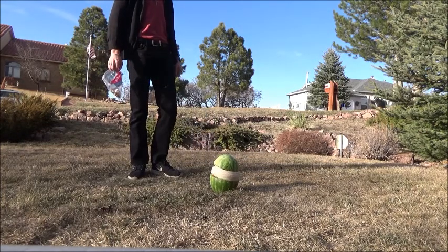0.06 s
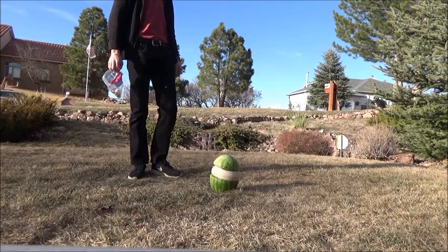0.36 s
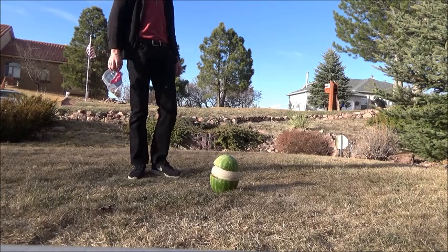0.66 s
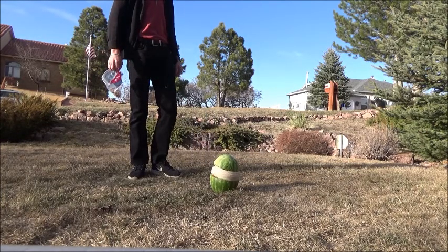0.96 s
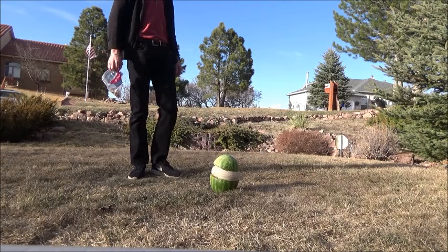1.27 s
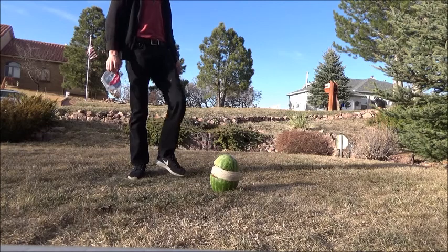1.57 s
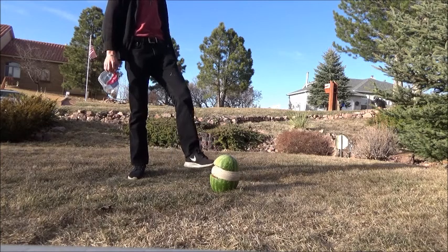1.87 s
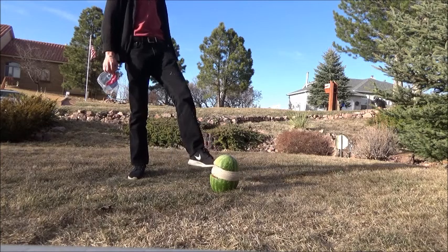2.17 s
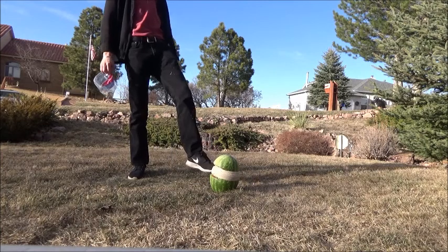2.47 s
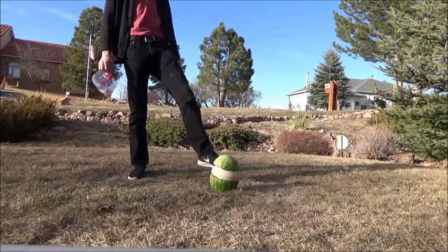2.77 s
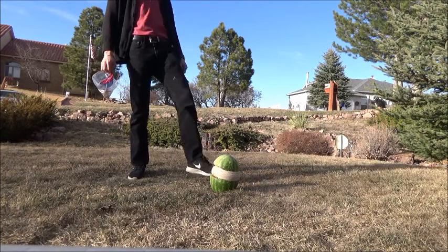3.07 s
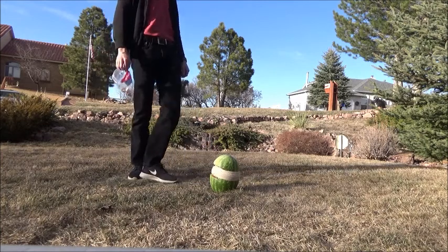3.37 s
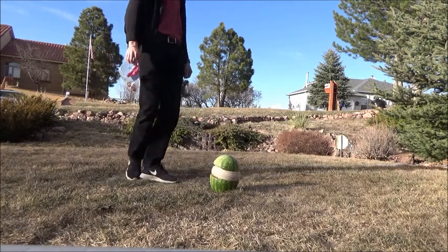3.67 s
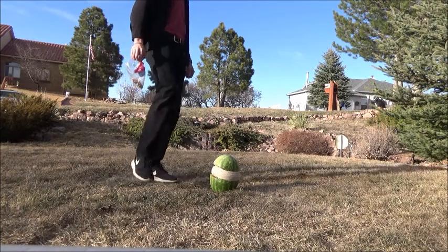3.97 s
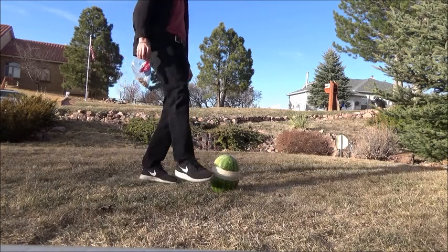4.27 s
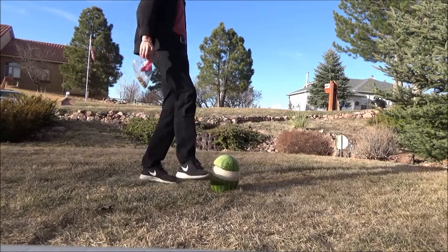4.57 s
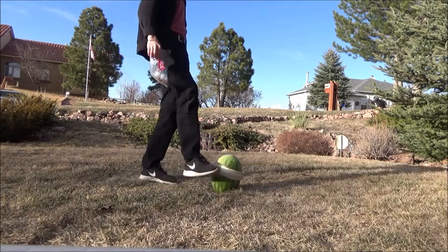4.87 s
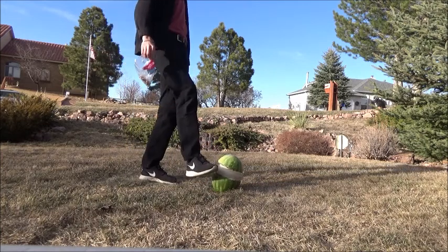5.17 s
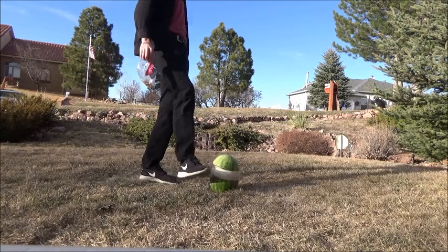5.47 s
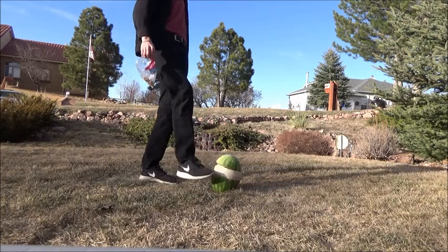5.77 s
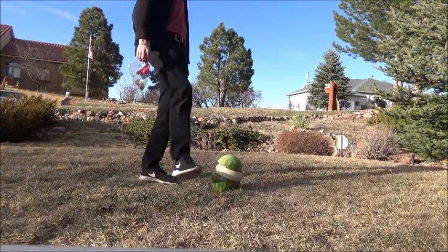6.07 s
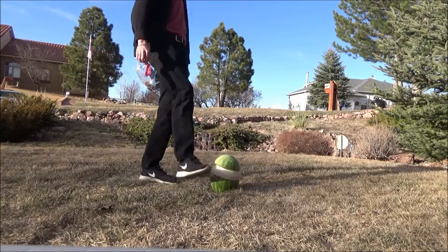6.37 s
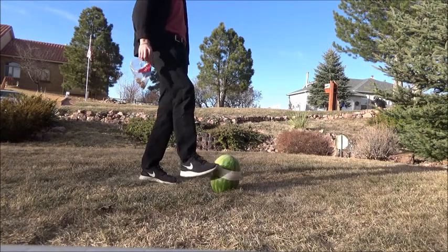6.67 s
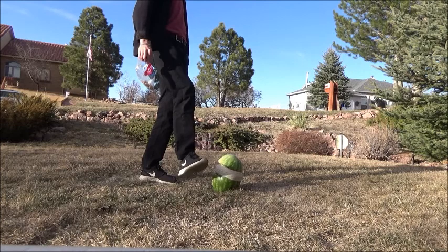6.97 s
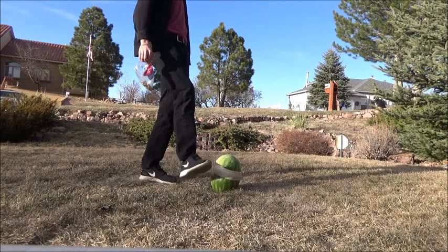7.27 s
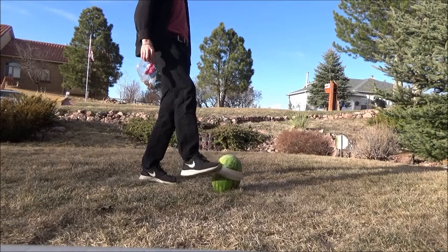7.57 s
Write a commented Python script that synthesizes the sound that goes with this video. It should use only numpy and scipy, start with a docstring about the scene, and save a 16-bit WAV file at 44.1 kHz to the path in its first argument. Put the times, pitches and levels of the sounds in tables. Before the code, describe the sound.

Outdoors on a dry lawn, light wind and distant traffic make a quiet, steady background. Rubber bands slip on a watermelon with a few sharp snaps as a shoe pushes it. The foot steps back into crackling grass, with a faint rustle of trousers and a plastic bag. Then come six soft kicks, dull thuds with small scuffs, mixed with more snaps. The microphone is a few steps away.

```python
"""Rubber bands slip and snap on a watermelon's rind as a shoe pushes and then kicks it on a dry lawn.
Each snap is a jerk that rings briefly; each kick is a scuff and a dull thud in the flesh.
The foot steps back into crackling grass, and trousers and a plastic bag rustle.
Behind it lie a bird, light wind, far traffic, a low hum and a camera's faint whirr and whine."""
import sys
import numpy as np
from scipy import signal
from scipy.fft import rfft, irfft, next_fast_len
from scipy.io import wavfile
from scipy.ndimage import map_coordinates

SR = 44100
rng = np.random.default_rng(int(sys.argv[2]) if len(sys.argv) > 2 else 0)


def wav_out(sig):
    """Save sig, one row per channel (or a flat mono array), as 16-bit PCM at SR to the path in sys.argv[1]."""
    wavfile.write(sys.argv[1], SR, np.round(np.clip(np.atleast_2d(sig).T, -1, 1) * 32767).astype(np.int16))


N = 340011

# The bands slipping. Each row: time in seconds, rind knock in dB and Hz, band slap in dB and Hz,
# bright tick in dB and Hz, burr of noise in dB compared with the jerk.
BAND_SNAPS = [(2.0923, -32, 1800, -15, 3850, -30, 10000, -8), (2.2926, -30, 1800, -16, 3660, -27, 9800, -1),
              (2.3423, -0.5, 1820, -11, 7000, 0.5, 10000, -13),
              (2.3448, -7, 1800, -14.5, 4200, -9.5, 7900, 0.5),
              (3.023, -30, 1800, -20, 3500, -20, 10000, -9), (3.035, -30, 1800, -23, 3500, -21, 10800, -9),
              (3.4235, -20, 2300, 1, 3300, 6.5, 10300, -20), (4.8592, -14, 1400, -13, 2900, -26, 9800, -11),
              (4.9341, -9, 1300, -8.5, 2900, -14, 9800, 3), (4.9364, -8, 1190, -5, 4500, -1, 9500, -26),
              (4.938, -6, 1900, -8, 3200, -5.5, 9300, -10),
              (5.0214, -16.5, 1900, -19.5, 4100, -24, 8800, 9.5),
              (5.0695, -17, 1800, -18, 3500, -20.5, 9900, -6),
              (5.3345, -30, 1800, -33, 3500, -19, 9500, -10), (5.545, -27, 1800, -15, 3480, -24, 9200, 4.5),
              (5.8219, -17, 1600, -7.5, 3700, -8.5, 9350, -9),
              (6.393, -13.5, 1490, -19.5, 2980, -32, 9800, 3),
              (6.780, -5.5, 1890, -22, 3000, -17, 9800, -8), (7.6235, -17, 2200, -23, 3300, -9, 10500, -16),
              (7.6565, -0.5, 1440, -3.5, 2940, -6.5, 9300, -7), (7.6588, 0, 1440, -7, 3070, -16, 10200, 1)]


def rubber_bands(knock_width=680, slap_width=1900, tick_width=2900, burr_t60=0.016, burr_rise_s=0.0018):
    """Each snap is a sharp jerk inside a brief burr of noise that swells and fades; three tones ring."""
    out, lead = np.zeros(N), SR // 100
    t = np.arange(-lead, SR // 25) / SR
    for s, knock_db, knock_hz, slap_db, slap_hz, tick_db, tick_hz, burr_db in BAND_SNAPS:
        burr = rng.standard_normal(len(t)) * amp(-60 * np.maximum(t / burr_t60, -t / burr_rise_s))
        jerk = (t == 0) + amp(burr_db) * burr / np.linalg.norm(burr)
        body = lambda f: (amp(knock_db) * resonance(f, knock_hz, knock_width)
                          + amp(slap_db) * resonance(f, slap_hz, slap_width)
                          + amp(tick_db) * resonance(f, tick_hz, tick_width))
        add(out, s - lead / SR, filtered(jerk, body))
    return out


# The ringing of the flesh, and of the toe on the rind.
# Each row: base pitch in Hz, relative level in dB, seconds to fade by 60 dB (called t60).
FLESH_TONES = [(141, -6.5, 0.074), (177, -10.5, 0.06)]
TOE_TONES = [(265, 1, 0.031), (353, 4.5, 0.022)]
# The shoe rubbing the rind. Each row: frequency in Hz, relative level in dB.
SCUFF_SPECTRUM = [(200, 4), (600, 1.5), (2500, 1), (6000, -8), (10000, -6.5), (15000, -22)]
# The shoe hitting the melon. Each row: time in seconds, thud in dB, toe knock in dB,
# toe pitch multiplier, scuff in dB, rebound scuff in dB.
MELON_KICKS = [(4.8631, -24, -27.5, 1.2, -41, -49.5), (5.8205, -22, -23.5, 1.22, -38.5, -55),
               (6.3954, -25.5, -28.5, 1.27, -45, -51.5), (6.7790, -25.5, -26, 0.91, -42.5, -52),
               (7.2459, -27.5, -24, 0.9, -45.5, -51.5), (7.5901, -19.5, -24.5, 0.93, -41.5, -50)]


def kicks(attack_s=0.0023, lead_s=0.0039, scuff_s=0.0041, rebound_delay_s=0.013, rebound_s=0.0072):
    """The toe scuffs the rind, thuds into the flesh and scuffs again on the rebound."""
    thuds, rubbing, t = np.zeros(N), np.zeros(N), np.arange(SR // 4) / SR
    swell = lambda peak_s: t / peak_s * np.exp(1 - t / peak_s)
    for s, thud_db, toe_db, pitch, scuff_db, rebound_db in MELON_KICKS:
        blow = amp(thud_db) * ring(FLESH_TONES, t) + amp(toe_db) * ring(TOE_TONES, t, pitch)
        add(thuds, s, -blow * (1 - np.exp(-t / attack_s)))
        add(rubbing, s - lead_s, amp(scuff_db) * swell(scuff_s))
        add(rubbing, s + rebound_delay_s, amp(rebound_db) * swell(rebound_s))
    return thuds + rubbing * noise(SCUFF_SPECTRUM, grain_db=1)


def settling(delay_s=0.022):
    """A loudness curve: after each kick the leg recoils and the melon settles in the grass."""
    return together(amp(scuff_db) * surge(s + delay_s, rise=0.02, fall=0.054)
                    for s, _, _, _, scuff_db, _ in MELON_KICKS)


# The sole landing. Each row: start in seconds, level in dB.
SOLE_LANDINGS = [(3.4519, -28.5), (3.4705, -26.5), (3.4835, -29.5)]
# The sole's hollow knock. Each row: pitch in Hz, relative level in dB, seconds to fade by 60 dB.
SOLE_TONES = [(370, -9, 0.021), (578, 2.5, 0.024), (780, -19, 0.018), (1190, -3.5, 0.022)]
# A foot pressing the grass. Each row: time of full weight in seconds, level in dB, rise in seconds.
GRASS_PRESSES = [(3.448, -47.5, .016), (3.495, -45, 0.033), (3.815, -52, 0.074), (3.95, -54, 0.016),
                 (4.26, -59, 0.076), (4.45, -54, 0.041), (5.03, -48, 0.015)]
# Dry grass crackling. Each row: frequency in Hz, relative level in dB.
GRASS_SPECTRUM = [(150, -11), (550, 8.5), (1250, 1), (2000, -1), (3500, -10.5), (6500, -16), (10000, -24),
                  (15000, -30)]


def footsteps(attack_s=0.00058, crunch_db=-8, crunch_t60=0.006, settle_db=-14):
    """The sole lands in hollow knocks, each with a crunch; grass crackles as weight shifts."""
    knocks, t = np.zeros(N), np.arange(SR // 10) / SR
    presses = [amp(db) * surge(s, rise, fall=0.72 * rise) for s, db, rise in GRASS_PRESSES]
    crushing = together(presses + [amp(settle_db) * settling()])
    for s, db in SOLE_LANDINGS:
        add(knocks, s, amp(db) * ring(SOLE_TONES, t) * (1 - np.exp(-t / attack_s)))
        add(crushing, s, amp(db + crunch_db - 60 * t / crunch_t60))
    return knocks + crushing * noise(GRASS_SPECTRUM, grain_db=4)


# A leg or arm swinging. Each row: time of top speed in seconds, level in dB, rise in seconds.
LIMB_SWINGS = [(1.51, -61, .13), (1.67, -57, .04), (2.35, -65, .04), (3.46, -54, 0.07),
               (3.685, -53.5, 0.032), (3.84, -55.5, .07), (4.23, -64, 0.12), (4.42, -59.5, .05),
               (4.95, -58.5, .07)]
# The bag and trousers crinkling. Each row: frequency in Hz, relative level in dB.
CRINKLE_SPECTRUM = [(1000, -6), (4000, -7), (6500, -12), (9000, -5), (10300, -2), (12000, -9.5),
                    (15500, -30)]


def rustle(still_db=-75, balancing_db=-66, settle_db=-19, clump_db=1.8, ticks_per_s=4, tick_db=-28):
    """Thin plastic and cloth crinkle in clumps as the body moves; now and then a crease ticks."""
    swings = [amp(db) * surge(s, rise, fall=rise) for s, db, rise in LIMB_SWINGS]
    balancing = amp(balancing_db) * surge(3.8, rise=0.74, fall=np.inf)  # standing on one leg
    motion = together(swings + [amp(still_db), balancing, amp(settle_db) * settling()])
    crinkle = motion * amp(clump_db * wobble(40)) * noise(CRINKLE_SPECTRUM, grain_db=1)
    creases = (rng.random(N) < ticks_per_s / SR) * amp(tick_db + 2.5 * rng.standard_normal(N))
    ticks = filtered(creases, lambda f: resonance(f, 5500, 4000) + resonance(f, 9300, 4000))
    return crinkle + ticks


# A far bird. Each row: middle of the chirp in seconds, pitch in Hz, level in dB.
BIRD_CHIRPS = [(3.953, 2220, -58), (4.272, 2130, -56)]


def bird(rise_s=0.015, glide_hz=40):
    """Two faint short chirps, each sliding from just above its pitch to just below."""
    t, out = np.arange(N) / SR, np.zeros(N)
    for s, hz, db in BIRD_CHIRPS:
        progress = (t - s) / rise_s
        phase = 2 * np.pi * np.cumsum(hz - glide_hz * np.tanh(progress)) / SR
        out += amp(db) * np.exp(-progress ** 2 / 2) * np.sin(phase + 0.7 * wobble(120))
    return out


def garden_echo(x, echo_db=-16.5, t60=0.16):
    """Ground and shrubs add a weak, short echo to the sound, different in each ear."""
    t = np.arange(SR // 5) / SR
    tail = rng.standard_normal((2, len(t))) * amp(-60 * t / t60)
    echo = signal.fftconvolve(x[None], tail / np.linalg.norm(tail[0]), axes=1)[:, :N]
    return x + amp(echo_db) * shaped(echo, [(150, -11), (900, 8), (3500, -41), (9000, -23)])


# Wind and far traffic: their hiss and their rumble. Each row: frequency in Hz, relative level in dB.
AIR_SPECTRUM = [(150, -6.5), (250, -2.5), (420, -3), (700, -3), (950, -4.5), (1250, -8.5), (1450, -12),
                (2130, -15), (3100, -17.5), (4500, -20), (8000, -22.5), (15500, -25.5)]
RUMBLE_SPECTRUM = [(20, -15), (47, -45), (62, 2), (88, 5), (105, 1), (135, 4), (200, -0.5), (300, -15),
                   (450, -36.5)]


def wind_and_traffic(air_db=-49.5, rumble_db=-51.5, gust_db=-55):
    """Steady wind and far traffic, with one soft gust buffeting the microphone."""
    air = amp(air_db + 0.21 * wobble(4.7)) * all_around(AIR_SPECTRUM)
    rumble = amp(rumble_db - 0.35 * wobble(4.9)) * all_around(RUMBLE_SPECTRUM)
    buffeting = noise([(20, -2), (45, -4), (90, 1), (300, -28), (1000, -100)])
    gust = amp(gust_db) * surge(5.74, rise=0.22, fall=0.35) * buffeting
    return air + rumble + gust


# How much the two ears differ. Each row: frequency in Hz, side level compared with mid in dB.
STEREO_WIDTH = [(60, -34), (110, -30), (200, -15), (380, -9), (700, -7.5), (1290, -2), (2380, -2),
                (4400, -4.5), (8120, -9), (15000, -67)]


def all_around(spectrum):
    """Stereo noise: alike in both ears in the bass and treble, wide in between."""
    mid = noise(spectrum)
    side = shaped(noise(spectrum), STEREO_WIDTH)
    return np.array([mid + side, mid - side])


# The tones of a low hum. Each row: pitch in Hz, level in dB.
HUM_TONES = [(59.4, -59), (118.8, -58.5), (178, -74)]


def hum(waver_db=1.2):
    """Three low tones, each wavering a little in level and pitch."""
    t, out = np.arange(N) / SR, np.zeros(N)
    for hz, db in HUM_TONES:
        peak = amp(db + waver_db * wobble(2.71)) * np.sqrt(2)
        out += peak * np.sin(2 * np.pi * hz * t + 0.81 * wobble(4.3))
    return out


def lens_motor(on_s=2.2877, off_s=5.2, running_db=-67.5, idle_db=-77, steps_per_s=30, t60=0.056):
    """The camera's small motor steps along, harder for a few seconds; each step rings its housing."""
    since_step = (np.arange(N) / SR - on_s) % (1 / steps_per_s)
    steps = amp(-60 * since_step / t60) * rng.standard_normal(N)
    housing = unit(filtered(steps, lambda f: resonance(f, hz=3320, width=220)))
    running = amp(running_db) * surge(on_s, rise=0.058, fall=0.61, hold=off_s - on_s)
    return together([running, amp(idle_db)]) * housing


def whine(hz=7866, width=80, db=-74):
    """The camera's electronics give a thin, fuzzy whine."""
    return amp(db) * unit(filtered(rng.standard_normal(N), lambda f: resonance(f, hz, width)))


def amp(db):
    """Turn decibels into a multiplier."""
    return 10 ** (np.asarray(db) / 20)


def unit(x):
    """Scale a sound to an average (rms) level of 1."""
    return x / np.sqrt(np.mean(x ** 2) + 1e-20)


def add(track, s, sound):
    """Mix a sound into a track, starting at s seconds."""
    start = round(s * SR)
    track[start:start + len(sound)] += sound[:len(track) - start]


def together(levels):
    """The level of several unrelated sounds at once."""
    return np.sqrt(sum(level ** 2 for level in levels))


def surge(peak_s, rise, fall, hold=0):
    """A rounded loudness curve: it reaches 1 at peak_s, holds, then falls. Times are in seconds."""
    t = np.arange(N) / SR - peak_s
    return np.exp(-0.5 * (np.minimum(t, 0) / rise + np.maximum(t - hold, 0) / fall) ** 2)


def wobble(rate):
    """A smooth curve through `rate` random points a second."""
    points = rng.standard_normal(int(N * rate / SR) + 4)
    return map_coordinates(points, [np.arange(N) * rate / SR])


def filtered(x, response):
    """Multiply each frequency in x by response(frequency)."""
    n = x.shape[-1]
    padded = next_fast_len(n + 4096)
    return irfft(rfft(x, padded) * response(np.fft.rfftfreq(padded, 1 / SR)), padded)[..., :n]


def shaped(x, spectrum):
    """Filter x with a curve drawn through (Hz, dB) points."""
    hz, db = np.transpose(spectrum)
    return filtered(x, lambda f: amp(np.interp(np.log(f + 1), np.log(hz + 1), db)))


def resonance(f, hz, width):
    """A filter that rings at hz, `width` Hz wide, applied twice for steeper sides."""
    return (1j * f * width / (hz * hz - f * f + 1j * f * width)) ** 2


def ring(tones, t, pitch=1):
    """The fading tones of a struck object, balanced a little differently at each blow."""
    return sum(amp(db + rng.normal(0, 1) - 60 * t / t60) * np.sin(2 * np.pi * hz * pitch * t)
               for hz, db, t60 in tones)


def noise(spectrum, grain_db=0):
    """Shaped noise at level 1; grain_db breaks it into crackles of uneven size."""
    grains = rng.standard_normal(N) * amp(grain_db * wobble(1500))
    return unit(shaped(grains, spectrum))


def scene():
    """The melon and the feet in the middle, the neighbourhood all around."""
    middle = rubber_bands() + kicks() + footsteps() + rustle() + bird()
    return garden_echo(middle) + wind_and_traffic() + hum()


def record(dry):
    """The camera adds its own faint noises and cuts off the highest treble."""
    return filtered(dry + lens_motor() + whine(), lambda hz: hz < 15900)


dry = scene()
out = record(dry)
wav_out(out)
```